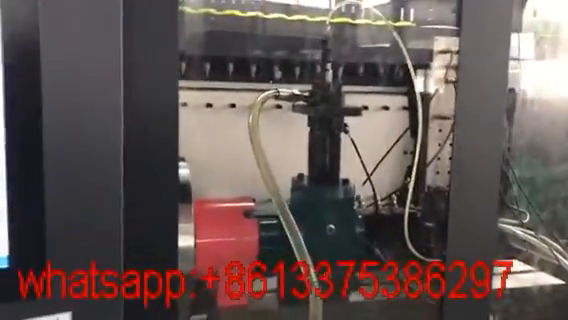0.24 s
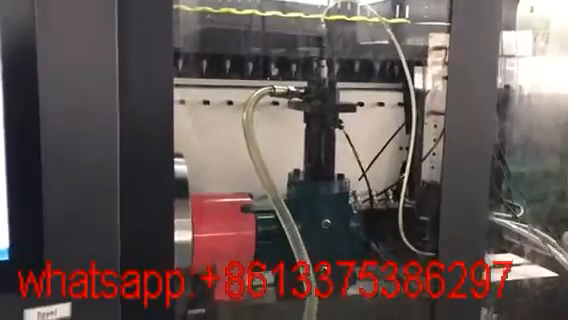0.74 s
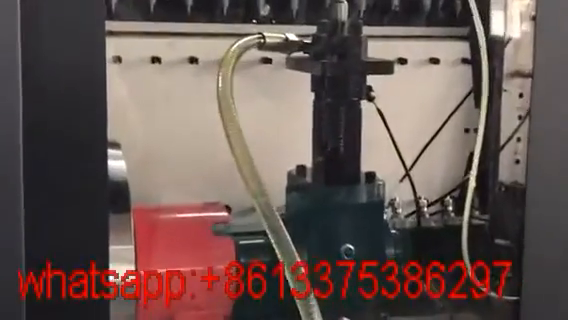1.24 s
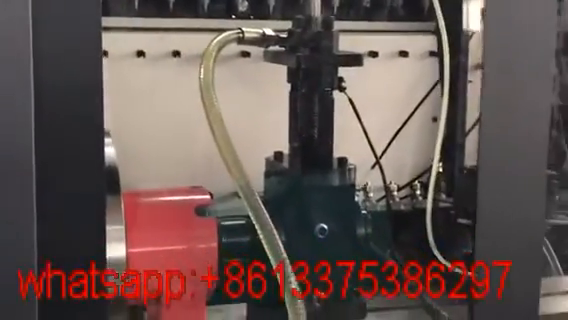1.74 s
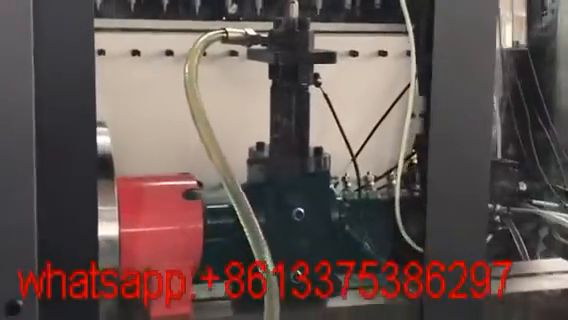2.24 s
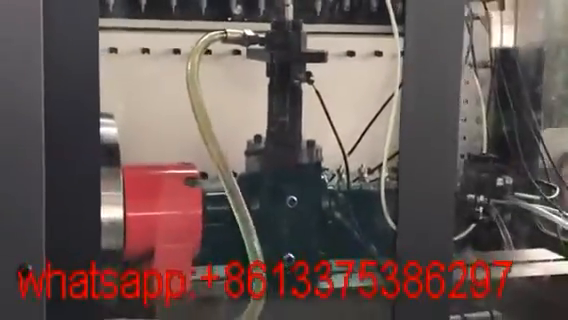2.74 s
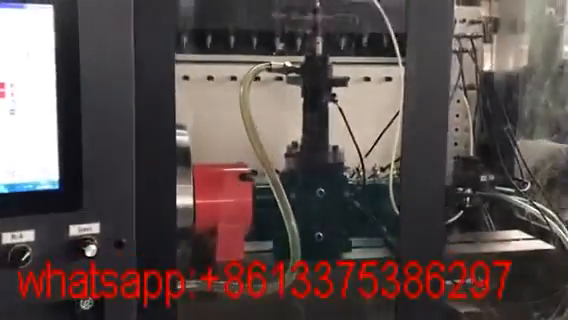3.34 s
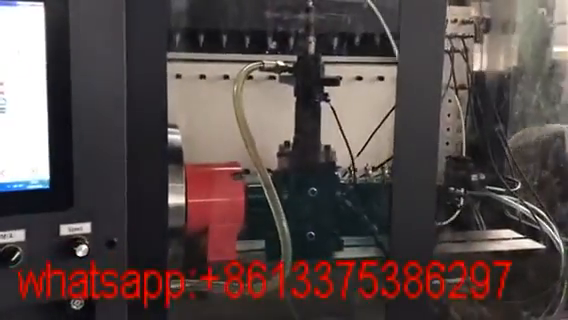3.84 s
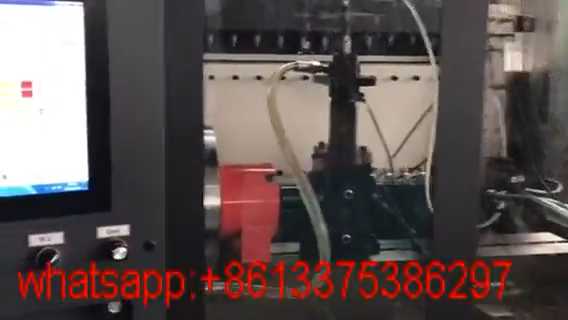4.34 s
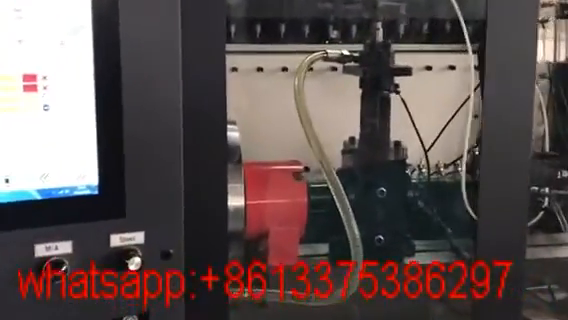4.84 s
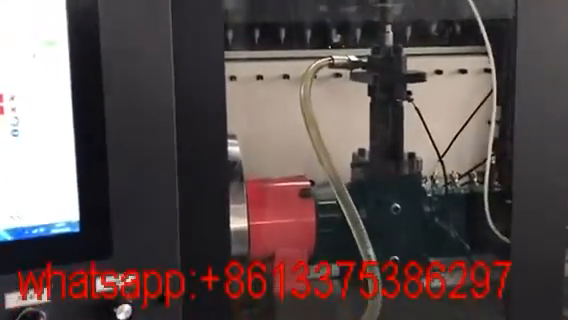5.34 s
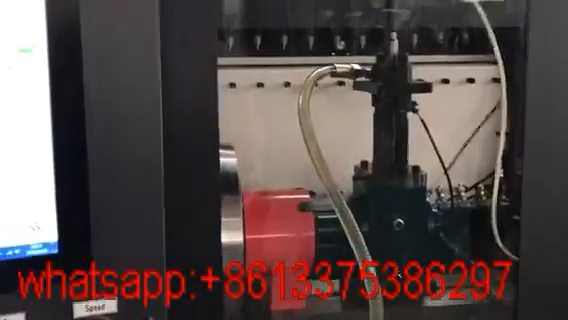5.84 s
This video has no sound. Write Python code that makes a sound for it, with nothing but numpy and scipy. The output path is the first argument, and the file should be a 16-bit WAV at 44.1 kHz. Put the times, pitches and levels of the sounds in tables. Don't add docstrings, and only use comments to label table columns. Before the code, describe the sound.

Fast regular machine knocking in a hard workshop, heard from a phone close to the cabinet. Low drone, motor rush and thin high electrical whine lie underneath. Delivery starts around one second and each stroke becomes a hard steel knock with clattering tail. The sound dulls slightly mid-way as the phone turns, then returns; a hiss and low bumps stray in late.

```python
import sys
import numpy as np
from scipy import signal
from scipy.fft import rfft, irfft, next_fast_len
from scipy.io import wavfile
from scipy.ndimage import map_coordinates

SR = 44100
rng = np.random.default_rng(int(sys.argv[2]) if len(sys.argv) > 2 else 0)


def put_to_file(sound):
    columns = np.atleast_2d(sound).T
    safe = np.clip(columns, -1, 1)
    whole_steps = np.round(safe * 32767)
    wavfile.write(sys.argv[1], SR, whole_steps.astype(np.int16))


def volts(x):
    e = np.asarray(x, float) / 20
    return 10 ** e


N = 267673
SHAFT_HZ, TURNS = 12.727, 77
STROKE_S = .036
FIRST_FUELLED = 13
DELIVERY_MS = -1.184

# (time after delivery starts [ms], level [dB])
LINE_BLOWS = [
    (1.5, -4.5),
    (4.5, -12.5),
    (10.3, -12.5),
    (15.6, -10.5),
    (20.5, -13.5),
    (29, -32),
    (42, -20.5),
]
HOUSING_HZ = [573, 712, 762, 830, 876, 908, 978, 1018, 1060, 1100, 1158, 1195, 1235, 1320, 1440, 1490, 2000,
              2210]
# (width [Hz], level as heard [dB])
HOUSING_RING = [(25, -9), (55, -9), (26, -1), (28, -2.5), (32, -0.5), (26, -1.5), (32, 2), (22, 7),
                (36, 5.5), (36, -2), (30, -2.5), (30, -5), (34, -5.5), (65, -6), (55, -8), (55, -9),
                (90, -17), (60, -16)]
FACE_BORDERS_HZ = [930, 1100]
# (level [dB], change when turned away [dB], lag [ms])
HOUSING_FACES = [
    (0, 0, 1.5),
    (0, -3.5, 0),
    (0, 7, 0),
]


def pressure_blow():
    t = np.arange(SR // 12) / SR
    ms, blow_db = np.transpose(LINE_BLOWS)
    slip_ms = .03 * rng.standard_normal((TURNS, len(LINE_BLOWS), 1))
    scatter_db = .6 * rng.standard_normal((TURNS, len(LINE_BLOWS), 1))
    since = np.maximum(t - (DELIVERY_MS + ms[:, None] + slip_ms) / 1000, 0) / 0.0001
    pushes = (volts(blow_db[:, None] + scatter_db) * since * np.exp(-since)).sum(1)
    spray = volts(-31 - 60 * t / .25) * rng.standard_normal(pushes.shape)
    stroke = pushes + spray
    force = each_turn(stroke, blow_levels())

    modes = np.column_stack([HOUSING_HZ, HOUSING_RING]).astype(float)
    drive_power = np.mean(abs(stroke @ np.exp(-2j * np.pi * np.outer(t, HOUSING_HZ))) ** 2, 0)
    modes[:, 2] -= 10 * np.log10(drive_power)

    face = np.digitize(HOUSING_HZ, FACE_BORDERS_HZ)
    away, = curves(PHONE_FACING)
    ring = np.zeros(N)
    for k, (db, away_db, lag_ms) in enumerate(HOUSING_FACES):
        late_force = np.roll(force, round(lag_ms * SR / 1000))
        ring += volts(db + away_db * away) * ringing(late_force, modes[face == k], order=2)
    return volts(-22.0) * unit(ring)


# (turn [count], extra level [dB])
ODD_STROKES = [
    (28, 2.1),
    (37, -1.3),
    (53, -1.3),
    (59, 1.8),
    (64, 2.3),
    (68, 3.8),
]


def blow_levels():
    since = np.arange(TURNS) - FIRST_FUELLED
    surge_db = 0.5 * np.exp(-abs(since) / SHAFT_HZ / 1)
    base_db = -17
    db = per_stroke(base_db, away_db=-4.1, scatter_db=-0.9) + surge_db
    turn, extra_db = np.transpose(ODD_STROKES)
    db = db + np.bincount(turn.astype(int), extra_db, TURNS)
    return np.where(since >= 0, db, base_db - 14)


# (frequency [Hz], width [Hz], level [dB])
TAPPET_MODES = [(1052, 85, 18), (1080, 59, 17.5), (1250, 5.6, -18), (1375, 13.6, 10.5), (1714, 70, 1.5),
                (1913, 21, 8.5), (2150, 1000, -3.5), (2704, 155, -1.5), (2960, 145, -9)]
# (frequency [Hz], level [dB per Hz])
CLANK_COLOUR = [(740, -17.5), (1250, -4), (1490, -5), (1650, -3.5), (2090, -6), (2250, -5), (2900, -14.5),
                (4080, -13.5), (5000, -18.5), (6500, -37), (11000, -120)]
# (frequency [Hz], level [dB per Hz])
CLATTER_COLOUR = [(2060, 5), (3500, 6), (4200, 3), (4950, 10), (6280, 2.5), (6610, 3), (7080, -4.5),
                  (10500, -3.5), (13000, -11), (15800, -5)]
# (frequency [Hz], width [Hz], level [dB])
SPRING_MODES = [(6220, 230, -0.5), (6470, 120, 1), (6740, 82, -0.5), (7110, 150, 2), (7360, 110, -5)]


def cam():
    fuel = load()
    tappet_hits = impacts(0.0059, 0.16, spiky_db=2.0, fresh=0.17)
    tappet = volts(-29.0 - 1.3 * fuel) * unit(ringing(tappet_hits, TAPPET_MODES))
    clank_hits = impacts(0.017, 0.081, spiky_db=1.0, fresh=0.89)
    clank = volts(-34.5 + 4.04 * fuel) * coloured(clank_hits, CLANK_COLOUR)
    clatter_hits = impacts(0.00097, 0.1, spiky_db=1.0, fresh=0.94)
    clatter = volts(-37) * coloured(clatter_hits, CLATTER_COLOUR)
    hidden = np.clip((np.arange(N) / SR - 2.35) / .2, 0, 1)
    spring_hits = impacts(0.0023, 0.16, spiky_db=2.5, fresh=0.67)
    spring = volts(-42 - 3 * hidden) * unit(ringing(spring_hits, SPRING_MODES))
    return tappet + clank + clatter + spring


def impacts(rise_s, t60_s, spiky_db, fresh):
    t = np.arange(SR // 9) / SR
    db = per_stroke(-28.3, away_db=-3, scatter_db=0.8)
    grain = volts(spiky_db * rng.standard_normal((TURNS, len(t) // 40 + 1)))
    grain = grain.repeat(40, axis=1)[:, :len(t)]
    shape = (1 - np.exp(-(t / rise_s) ** 2)) * volts(-60 * (t / t60_s) ** 1.37)
    return each_turn(shape * grain * rattle(len(t), fresh, drift=.1), db)


def rattle(length, fresh, drift):
    a, b = rng.standard_normal((2, length))
    angle = drift * np.arange(TURNS)[:, None]
    share = np.clip(fresh, 0, 1)
    pattern = a * np.cos(angle) + b * np.sin(angle)
    return np.sqrt(1 - share) * pattern + np.sqrt(share) * rng.standard_normal((TURNS, length))


# (time [s], turned away [0-1])
PHONE_FACING = [(0, 0), (.9, 0), (1.1, 0), (1.6, 0), (2, 0), (2.5, 0.2), (3, 0.3), (3.5, 0.42), (4, 0.34),
                (4.5, 0.23), (5, 0.1), (5.5, 0), (6.07, 0.27)]


def per_stroke(level_db, away_db, scatter_db):
    s = np.arange(TURNS) / SHAFT_HZ + STROKE_S
    away = np.interp(s, *np.transpose(PHONE_FACING))
    return level_db + away_db * away + scatter_db * rng.standard_normal(TURNS)


def each_turn(shapes, db):
    start = np.searchsorted(turns(), np.arange(len(db)) + STROKE_S * SHAFT_HZ)
    where = start[:, None] + np.arange(shapes.shape[1])
    return np.bincount(where.ravel(), (volts(db)[:, None] * shapes).ravel(), N + SR)[:N]


def load():
    return np.clip(turns() - FIRST_FUELLED, 0, 1)


# (time [s], lag [ms])
SHAFT_LAG = [(0, .3), (1.3, -.05), (2, 0), (2.8, .3), (4, .15), (6.07, -.75)]


def turns():
    return SHAFT_HZ * (np.arange(N) / SR - curves(SHAFT_LAG)[0] / 1000)


# (frequency [Hz], moment [ms])
SWELL_MOMENTS = [(60, 32), (105, 30), (130, 60), (240, 61), (275, 52), (398, 53), (420, 83), (470, 46),
                 (580, 52)]
# (shaft order [per turn], level before delivery [dB], level during it [dB])
BED_ORDERS = [(5, -9, -14), (6, -14, -10), (8, 4.5, -6), (9, 1, 1), (11, -13, 0), (12, 4.5, 6),
              (13, -3, -44), (14, 4, 0), (16, -14, -20), (17, 1, 3.5), (18, 2, 2), (19, -2.5, -24),
              (20, -22, 3.3), (21, -0.5, -5.5), (22, -22, -1.5), (23, -0.5, -11.5), (24, 2, -2),
              (26, 1, -10), (27, -8, 0.7), (29, -2, -0.5), (30, -0.5, 0.5), (31, -15, 0), (32, 2, -44),
              (33, -1, -5.5), (34, 1.5, -10.5), (37, -33, -5), (40, -31, -11), (41, -39, -17),
              (42, -14, -2), (43, -5, -1.5)]


def drone():
    angle, fuel = turns(), load()
    order = np.arange(1, 47)
    delay_turns = along(SWELL_MOMENTS, order * SHAFT_HZ) / 1000 * SHAFT_HZ
    phase = np.cumsum(delay_turns) - .1 * rng.standard_normal(len(order))
    out = np.zeros(N)
    for k, idle_db, load_db in BED_ORDERS:
        k = round(k)
        level = volts(idle_db + fuel * (load_db - idle_db) + .9 * wobble(4))
        out += level * np.sin(2 * np.pi * (k * angle - phase[k - 1]))
    return volts(-28.5) * unit(out)


# (frequency [Hz], level [dB per Hz])
MOTOR_RUSH = [(18, -62), (33, -56), (134, -3.5), (352, -10), (412, -7), (483, -13), (644, -5), (794, -6.5),
              (1030, 3), (1610, -8.5), (1790, -12), (4600, -21.5), (7180, -20.5), (13100, -38),
              (15800, -38)]
GEAR_HZ = [646, 947.5, 1491]
# (level [dB], change under load [dB], waver [Hz])
GEAR_TONES = [
    (-41, -7, 1),
    (-33, -4, .6),
    (-42, -7, 3),
]
# (frequency [Hz], from [s], to [s], level [dB])
SUPPLY_WHINE = [(6227, 0, .9, -48), (6227, 1.45, 2.05, -48), (6227, 2.4, 5.9, -47), (6175, 0, 1.2, -48),
                (6175, 2.6, 4.5, -52), (6175, 5, 6.07, -49), (6126, 2.35, 3.1, -46), (6126, 4.3, 4.6, -47),
                (6126, 5.2, 6.07, -51), (6073, 2.3, 3.6, -48), (6073, 3.8, 5, -48), (6073, 5.25, 5.8, -51),
                (6320, 1.5, 2.1, -47), (6320, 4.8, 5.2, -50), (7192, 0, 1.7, -53), (7192, 5.2, 6.07, -52),
                (12785, 0, 1.15, -62), (12785, 1.6, 2.3, -65), (12785, 2.7, 4.2, -67),
                (12785, 5, 6.07, -65)]


def drive():
    t = np.arange(N) / SR
    rush_db = -25.5 + 0.15 * wobble(3.8) + 0.98 * wobble(20)
    out = volts(rush_db) * coloured(rng.standard_normal(N), MOTOR_RUSH)

    fuel = load()
    for hz, (db, change_db, waver_hz) in zip(GEAR_HZ, GEAR_TONES):
        cycles = hz * t + np.cumsum(waver_hz * wobble(23.4)) / SR
        level = volts(db + change_db * fuel + 0.5 * wobble(3.7))
        out += level * np.sqrt(2) * np.sin(2 * np.pi * cycles)

    sway_db = 1.6 * wobble(5)
    drift_s = np.cumsum(.0002 * wobble(25)) / SR
    for hz, begin, end, db in SUPPLY_WHINE:
        heard = np.clip(np.minimum(t - begin, end - t) / 0.075 + 1, 0, 1)
        out += volts(db + sway_db) * heard * np.sqrt(2) * np.sin(2 * np.pi * hz * (t + drift_s))
    return out


# (time [s], level [dB], t60 [s], extra sharpness [dB per octave])
AIR_PUFFS = [
    (3.992, -19, 0.3, 2),
    (5.11, -35, .12, 14),
]
# (frequency [Hz], level [dB per Hz])
AIR_COLOUR = [(1500, 10.5), (3000, 8), (6500, 1), (10000, -10), (15000, -21)]
# (time [s], level [dB], frequency [Hz], t60 [s])
DULL_KNOCKS = [
    (4.908, -16, 138, .09),
    (4.905, -25, 75, .14),
    (5.343, -10, 108, .13),
]


def strays():
    t = np.arange(N) / SR

    def after(s, t60_s, rise_s):
        since = np.maximum(t - s, 0)
        return (1 - np.exp(-since / rise_s)) * volts(-60 * since / t60_s)

    out = np.zeros(N)
    for s, db, t60_s, sharp_db in AIR_PUFFS:
        colour = [(hz, hz_db + sharp_db * np.log2(hz / 6000)) for hz, hz_db in AIR_COLOUR]
        out += volts(db) * after(s, t60_s, 0.0093) * coloured(rng.standard_normal(N), colour)
    for s, db, hz, t60_s in DULL_KNOCKS:
        out += volts(db) * after(s, t60_s, 0.0091) * np.sin(2 * np.pi * hz * (t - s))
    return out


def cabinet(x):
    delay = SR * (.0021 + .00008 * wobble(.8))
    treble = filtered(x, lambda hz: 1 / (1 + (2500 / (hz + 1)) ** 4))
    return x + volts(-10) * np.interp(np.arange(N) - np.round(delay), np.arange(N), treble)


# (frequency [Hz], t60 [s])
SHOP_DECAY = [(200, 0.32), (1000, 0.78), (4000, 1), (12000, 0.16)]


def shop(x):
    hz, t, z = signal.stft(rng.standard_normal(SR // 2), SR, nperseg=256)
    decay = volts(-60 * t / along(SHOP_DECAY, hz)[:, None])
    tail = signal.istft(z * decay, SR, nperseg=256)[1]
    return signal.fftconvolve(np.pad(x, (400, 0)), tail / np.linalg.norm(tail))[:N]


def unit(x):
    return x / np.sqrt(np.mean(x ** 2) + 1e-20)


def along(points, hz):
    f, v = np.transpose(points)
    return np.interp(np.log(hz + 1), np.log(f + 1), v)


def curves(rows):
    s, *cols = np.transpose(rows)
    return [np.interp(np.arange(N) / SR, s, c) for c in cols]


def wobble(rate):
    coarse = np.arange(0, N + 64, 64)
    knots = rng.standard_normal(int(N * rate / SR) + 4)
    return np.interp(np.arange(N), coarse, map_coordinates(knots, [coarse * rate / SR]))


def filtered(x, response):
    m = next_fast_len(N + SR // 2)
    return irfft(rfft(x, m) * response(np.fft.rfftfreq(m, 1 / SR)), m)[:N]


def ringing(x, modes, order=1):
    def response(f):
        total = 0
        for k, (centre, width, db) in enumerate(modes):
            damping = 1j * f * width
            resonance = damping / (centre * centre - f * f + damping)
            total = total + (-1) ** k * volts(db) * resonance ** order
        return total

    return filtered(x, response)


def coloured(x, spectrum):
    return unit(filtered(x, lambda hz: volts(along(spectrum, hz))))


def scene():
    bed, blow, train = drone(), pressure_blow(), cam()
    room = shop(volts(-11) * blow + volts(-10.0) * train)
    return (bed + blow + room + cabinet(train + drive()) + strays())[None]


def roll_off(x):
    return signal.sosfilt(signal.butter(12, 15900, fs=SR, output="sos"), x)


# (frequency [Hz], level [dB])
PORT_DIPS = [(4300, 0), (4950, -6.5), (5600, -1.5), (9600, 1), (10500, -3.5), (11400, 1.5), (13200, 3.5),
             (14000, -3.5)]


def record(dry):
    mix = filtered(dry[0], lambda hz: volts(along(PORT_DIPS, hz)) * (hz < 15830))[None]
    return roll_off(mix)


dry = scene()
out = record(dry)
put_to_file(out)
```